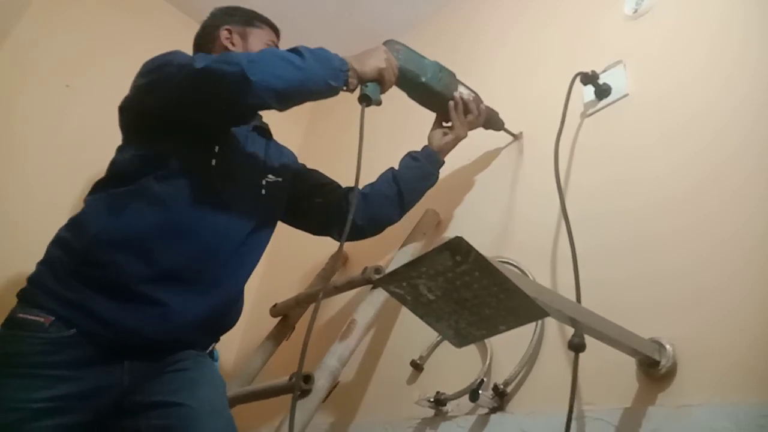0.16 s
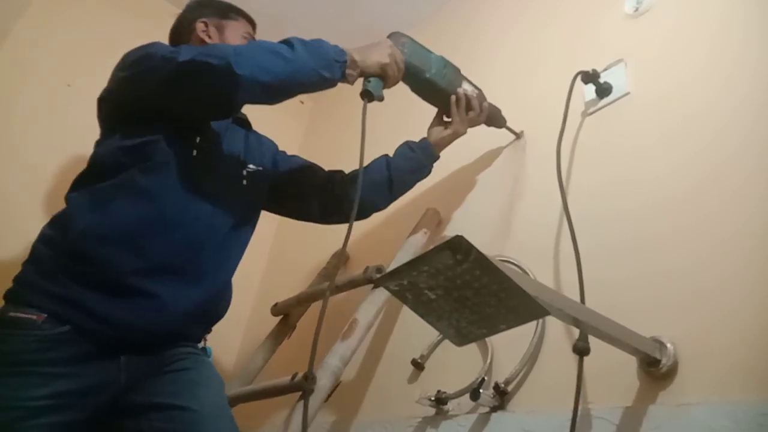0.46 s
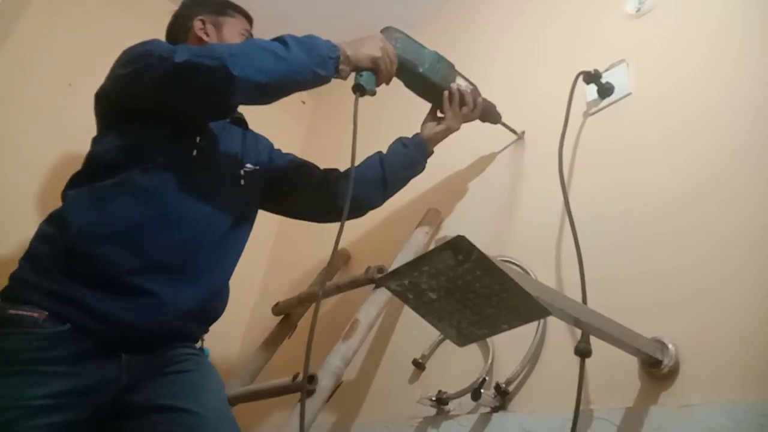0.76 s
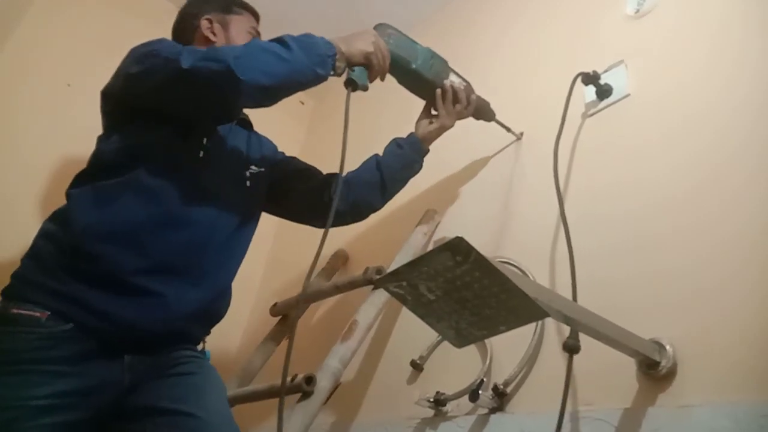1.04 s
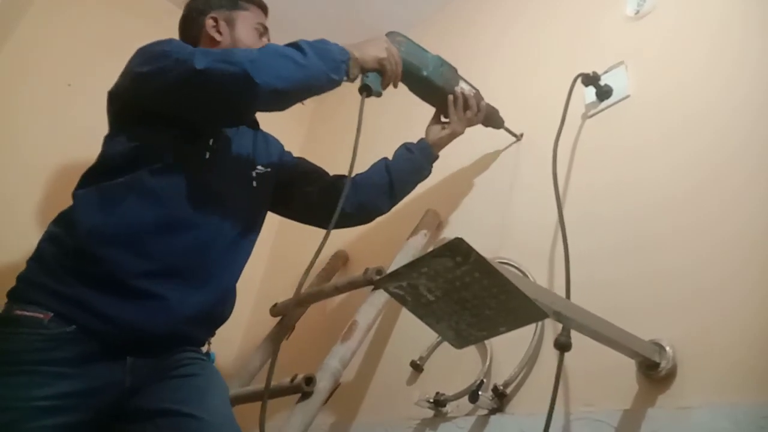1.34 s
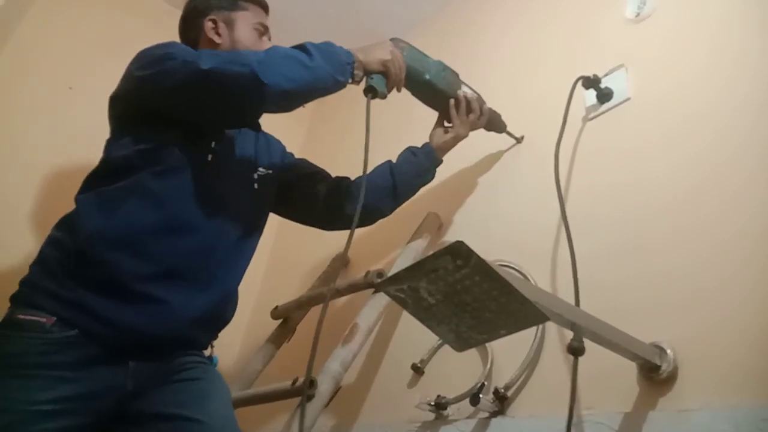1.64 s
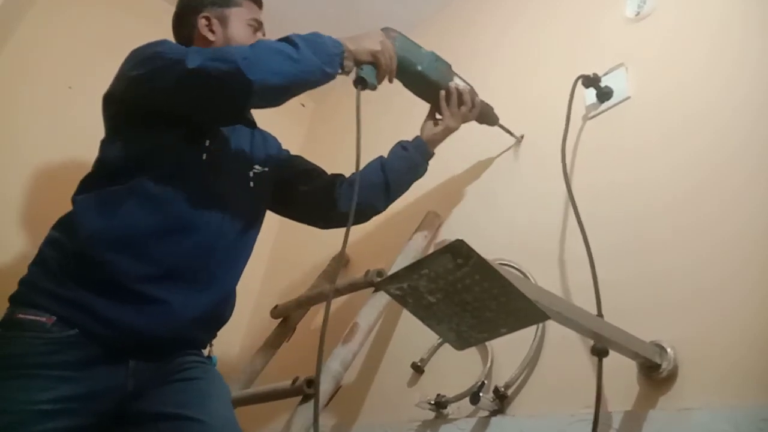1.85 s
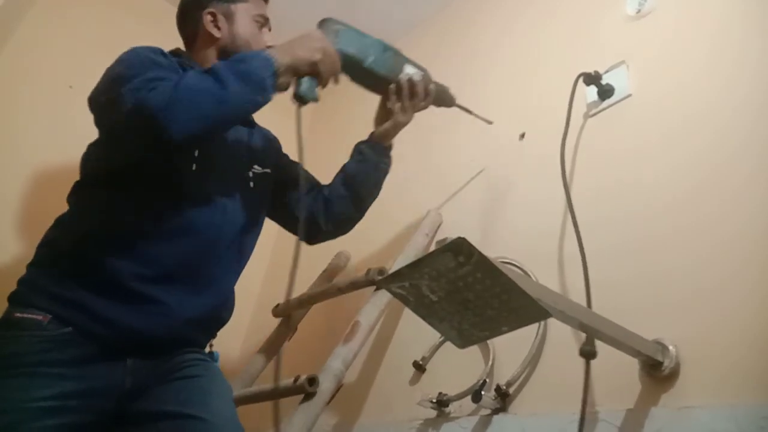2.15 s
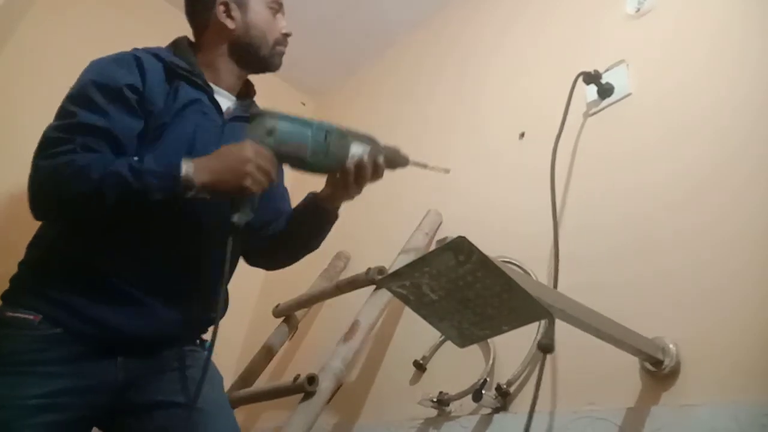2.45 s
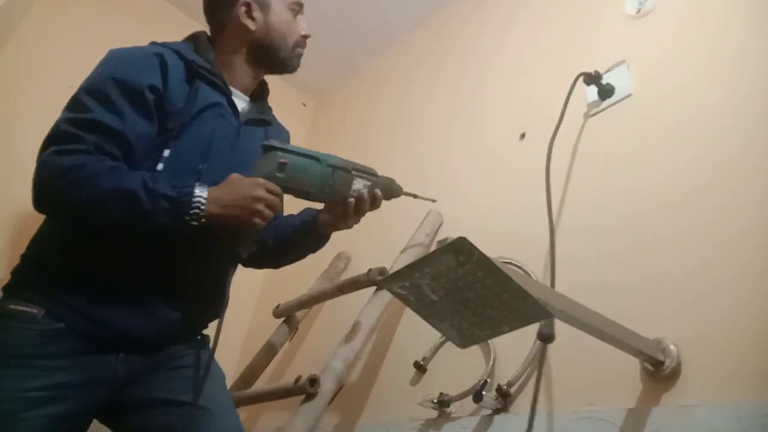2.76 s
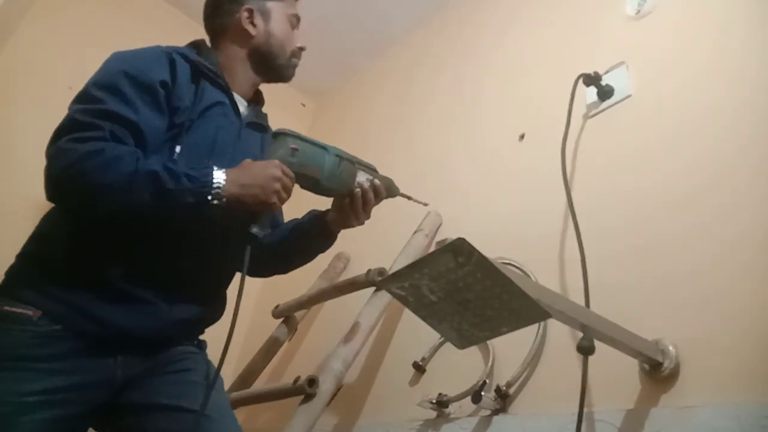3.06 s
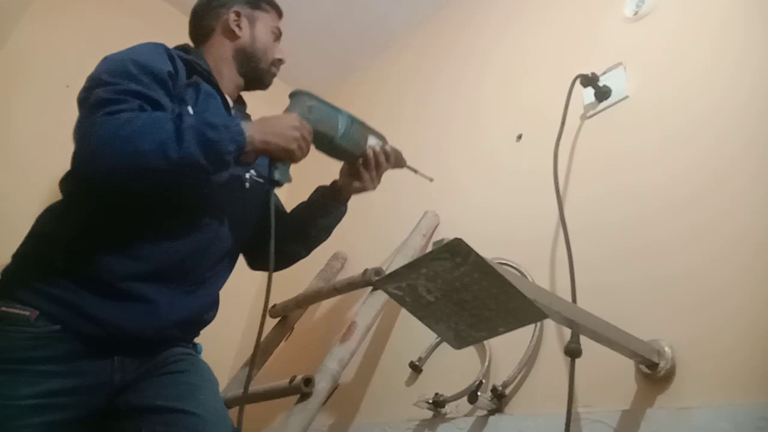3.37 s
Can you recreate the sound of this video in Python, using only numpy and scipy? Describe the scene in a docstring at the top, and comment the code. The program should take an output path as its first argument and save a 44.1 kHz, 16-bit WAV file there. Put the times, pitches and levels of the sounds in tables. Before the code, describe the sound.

Close single-microphone sound in a small reverberant room: harsh buzzing drill, falling whine and grinding as it slows, a short scrape, then quiet sleeve and cord rustling with light tool knocks over faint hiss.

```python
"""Small bare room, one microphone on both channels, hiss and a low rumble that is weaker while the drill is
loud. A corded hammer drill bores into the wall: gated noise blows over dense grinding contacts. The trigger
is let go at 0.47 s; the blows die, the gear whine falls and the slowing chuck catches, each catch a burst of
contacts. Near 2 s the bit scrapes out of the hole. Then sleeve and cord rustle as coloured grains and the
tool knocks as short noise bands."""
import sys
import numpy as np
from scipy import signal
from scipy.fft import rfft, irfft
from scipy.io import wavfile

SR = 44100
rng = np.random.default_rng(int(sys.argv[2]) if len(sys.argv) > 2 else 0)


def unload_audio(sound):
    """Save the sound as a 16-bit wav file, at the path given as the first command line argument."""
    columns = np.transpose(np.atleast_2d(sound))
    # keep every value between -1 and 1, then stretch to whole-number steps
    steps = np.round(np.clip(columns, -1, 1) * 32767)
    wavfile.write(sys.argv[1], SR, steps.astype(np.int16))


def invert_db(level):
    """Linear amplitude ratio for a level in decibels (20 dB per decade), elementwise."""
    return 10 ** (np.asarray(level, dtype=float) / 20)


N = 154350
T = np.arange(N) / SR

# Background hiss spectrum: pitch_hz, relative_db
HISS_COLOUR = [(410, -57.5), (700, -30), (1200, -5.5), (3000, -10), (7000, -17.5), (16000, -14)]
# Low rumble spectrum: pitch_hz, relative_db
RUMBLE_COLOUR = [(25, -53), (32, -26), (78, -10.5), (97, 1), (172, -5.5), (241, -16), (350, -22.5),
                 (738, -26.5), (1300, -38.5), (2640, -120)]
# Level of the rumble, low while the drill is loud: start_s, level_db
RUMBLE_LEVEL = [(0, -69), (.9, -68), (1.25, -63.5), (1.6, -50.5), (2.1, -56.5), (2.4, -55.5), (2.7, -58),
                (3.1, -51), (3.5, -57.5)]
# Soft knocks of the tool: start_s, level_db, centre_hz, length_s, half_width_octaves
KNOCKS = [(2.26, -54, 1640, 0.12, 0.31), (2.402, -50, 1440, 0.036, 0.2), (2.645, -50.5, 650, 0.053, 1.7),
          (2.818, -61, 1240, 0.051, 0.082), (3.165, -55.5, 2510, 0.019, 0.2),
          (3.292, -64, 1700, 0.068, 0.11), (3.416, -62, 1890, 0.023, 0.42)]
# Sleeve and cord rustling: start_s, level_db, bright_share (0-1)
RUSTLE = [(2.15, -63, 0.4), (2.262, -54.5, 0.7), (2.275, -51.5, 0.74), (2.43, -48.5, 0.45),
          (2.51, -46, 0.8), (2.6, -43.5, 0.58), (2.706, -54, 0), (2.75, -68, 0.6), (2.818, -57, 0.6),
          (2.84, -52, 0.4), (2.94, -64, 0.7), (2.99, -66, 0.4), (3.16, -95, 0.4), (3.167, -58.5, 0.62),
          (3.2, -62, 0.8), (3.225, -82, 0.5), (3.35, -60, 0.6), (3.41, -57.5, 0.5), (3.444, -53, 0.3),
          (3.5, -68, 0.4)]
# Rustle spectrum before tilting: pitch_hz, relative_db
RUSTLE_COLOUR = [(180, -64), (330, -30), (900, -21), (1250, -9.5), (1900, -2), (2700, -0.5), (4000, -4.5),
                 (7000, -2), (10000, 1), (16000, -18)]
# Rings of the rubbed casing: pitch_hz, width_hz, gain_db
CASING_RINGS = [(2800, 250, 4), (5500, 250, 4)]
# Bit drawn out of the hole: start_s, level_db
SCRAPE = [(1.93, -52), (1.955, -34), (1.98, -29.5), (2.02, -30), (2.05, -35), (2.08, -42), (2.12, -56),
          (2.16, -75)]
# Scrape spectrum: pitch_hz, relative_db
SCRAPE_COLOUR = [(180, -64), (340, -24.5), (850, -6.5), (1700, -6.5), (2300, 1), (2800, 1), (3300, 1),
                 (4800, -6), (7000, -5), (16000, -13.5)]
# Catches of the slowing chuck: start_s, peak_db
CATCHES = [(1.44, -38.5), (1.523, -30.5), (1.6, -38.5), (1.71, -70.5), (1.80, -41), (1.955, -37)]
# Tooth rate of the coasting gear pair: start_s, pitch_hz, level_db
MESH = [(.56, 4450, -34), (.7, 3830, -30), (.85, 3180, -30.5), (1.0, 2520, -26), (1.12, 2130, -24),
        (1.25, 1720, -28.5), (1.42, 1250, -31), (1.52, 960, -36), (1.61, 760, -34.5), (1.7, 520, -60)]
# Gears and bit grinding, before a common trim: start_s, relative_db
GRIND = [(0.0, -11.5), (0.158, -13), (0.398, -13), (0.828, -15.5), (1.282, -17.5), (1.386, -17.5),
         (1.616, -16.5), (1.702, -22), (1.714, -17), (1.806, -29), (1.948, -30), (1.96, -61.5)]
# Grinding spectrum: pitch_hz, relative_db
GRIND_COLOUR = [(100, -47), (180, -21), (350, -20.5), (790, -11), (1200, -11), (2100, -1.5), (3600, -5.5),
                (5000, -15), (7000, -14), (10000, -13), (16000, -22.5)]
# Steady motor tones: pitch_hz, level_db
MOTOR_TONES = [(104, -44)]
# Hammer blow spectrum: pitch_hz, relative_db
BLOW_COLOUR = [(40, -60), (75, -46.5), (150, -10.5), (270, -16.5), (400, -8), (730, -9.5), (1300, -10.5),
               (2600, -10), (6700, -9.5), (16000, -14.5)]
# Low tones at multiples of the blow rate: multiple, level_db
BLOW_TONES = [(1, -42.5), (2, -44), (3, -43.5)]
# Narrow rings of casing and wall under the hammer: pitch_hz, width_hz, level_db
HAMMER_RINGS = [(716, 22, -38), (894, 24, -37), (1082, 12, -39), (1454, 12, -38), (1631, 18, -40),
                (2660, 50, -34)]
# Colour of the microphone: pitch_hz, gain_db
MIC_COLOUR = [(4300, -0.5), (4900, -1.5), (5600, 1.5), (6200, -4), (6700, 0.5), (7400, -8), (8150, -17.5),
              (9200, -10), (10800, -13.5), (12900, -19.5), (14000, -10), (14900, -8), (15500, -1)]


def rms_one(x):
    """Scale to unit rms."""
    return x / np.sqrt(np.mean(x ** 2) + 1e-20)


def curve(rows, column=1, outside=None):
    """One table column against time; the end values hold unless outside is given."""
    rows = np.array(rows)
    return np.interp(T, rows[:, 0], rows[:, column], outside, outside)


def coloured(x, points):
    """Shape x by a spectrum table, straight lines over log frequency; rms 1."""
    hz = np.arange(N // 2 + 1) * SR / N + 1  # +1 keeps the log finite
    hz_at, db = np.transpose(points)
    gain_db = np.interp(np.log(hz), np.log(hz_at), db, -90, -90)
    return rms_one(irfft(rfft(x) * invert_db(gain_db), N))


def tilted(x, points, db_per_octave):
    """Colour with an extra slope about 2 kHz; rms 1."""
    return coloured(x, [(hz, db + db_per_octave * np.log2(hz / 2000)) for hz, db in points])


def filtered(x, hz, kind, order=2):
    """Butterworth filter, forward in time."""
    return signal.sosfilt(signal.butter(order, hz, kind, fs=SR, output="sos"), x)


def drift(rate_hz):
    """Slow chance with spread 1: noise through two equal low-pass poles."""
    r = np.exp(-2 * np.pi * rate_hz / SR)
    noise = rng.standard_normal(N + SR)
    return rms_one(signal.lfilter([1], [1, -2 * r, r * r], noise)[SR:])


def resonance(x, hz, width_hz):
    """Two-pole band-pass with gain 1 on top."""
    r = np.exp(-np.pi * width_hz / SR)
    poles = [1, -2 * r * np.cos(2 * np.pi * hz / SR), r * r]
    return signal.lfilter([(1 - r * r) / 2, 0, (r * r - 1) / 2], poles, x)


def grains(per_s, spread_db):
    """Random contacts of uneven size."""
    size = invert_db(spread_db * np.minimum(rng.exponential(1, N), 5)) * rng.standard_normal(N)
    return size * (rng.random(N) < per_s / SR)


def burst(start_s, length_s):
    """Quick rise and exponential fall, top about 1."""
    u = np.clip(T - start_s, 0, None) / length_s
    return u / (u + .15) * np.exp(-u) * (T > start_s) * 2


def hiss():
    """Steady background noise, shaped by its spectrum."""
    return invert_db(-62.5) * coloured(rng.standard_normal(N), HISS_COLOUR)


def rumble():
    """Low noise, weaker while the drill is loud, with a small random flicker."""
    level_db = curve(RUMBLE_LEVEL) + 1.2 * drift(7.9)
    return invert_db(level_db) * coloured(rng.standard_normal(N), RUMBLE_COLOUR)


def knocks():
    """Soft knocks of the tool: short bursts of band-passed noise."""
    out = np.zeros(N)
    for start_s, db, hz, length_s, octaves in KNOCKS:
        edges_hz = hz * 2 ** (octaves * np.array([-1, 1]))
        band = filtered(rng.standard_normal(N), edges_hz, "band", order=1)
        out += invert_db(db) * burst(start_s, length_s) * rms_one(band)
    return out


def rustle():
    """Sleeve and cord rub in many small contacts, moving between a dull and a bright colour."""
    share = np.clip(curve(RUSTLE, column=2), 0, 1)
    dull = tilted(grains(3500, 1.5), RUSTLE_COLOUR, -5)
    bright = tilted(grains(3500, 1.5), RUSTLE_COLOUR, 3)
    level_db = curve(RUSTLE, outside=-105) + 1.5 * drift(22)
    return invert_db(level_db) * (np.sqrt(1 - share) * dull + np.sqrt(share) * bright)


def scrape():
    """The bit drawn out of the hole: dense contacts of very uneven size."""
    return invert_db(curve(SCRAPE, outside=-101.0)) * coloured(grains(12000, 2.6), SCRAPE_COLOUR)


def handling():
    """Scrape, rustle and knocks, strengthened where the casing rings."""
    touch = scrape() + rustle() + knocks()
    return touch + sum((invert_db(db) - 1) * resonance(touch, hz, width_hz) for hz, width_hz, db in CASING_RINGS)


def chuck_catches():
    """The slowing chuck catches: short bursts of contacts, brighter than the grinding."""
    bright = tilted(grains(8100, 1), GRIND_COLOUR, 9)
    return bright * sum(invert_db(db) * burst(start_s, .022) for start_s, db in CATCHES)


def fan(speed):
    """Cooling fan: high-passed air noise whose strength follows a power of the speed."""
    air = filtered(rng.standard_normal(N), 2800, "high")
    return invert_db(-24 + 5.5 * drift(21)) * speed ** 2.38 * air


def gear_whine(speed):
    """Meshing teeth: a noisy band round a weak falling tone, and the armature's once-a-turn tone."""
    mesh = 2 * np.pi * np.cumsum(curve(MESH)) / SR
    width_hz, clean, pinion_teeth = 140, .8, 14
    whine = (clean + drift(width_hz)) * np.sin(mesh) + drift(width_hz) * np.cos(mesh)
    # the whine's level flickers slightly at random
    level_db = curve(MESH, column=2, outside=-104) + 1.2 * drift(27)
    armature = invert_db(-42 + 3.0 * drift(8)) * speed ** 7.0 * np.sin(mesh / pinion_teeth)
    return invert_db(level_db) * whine + armature


def grinding(speed):
    """Dense tooth and bit contacts; the low body and the top edge fade as the speed falls."""
    level_db = curve(GRIND, outside=-92) - 3.5 + 0.76 * drift(44)
    out = invert_db(level_db) * coloured(grains(20000, 1.0), GRIND_COLOUR)
    body = signal.sosfiltfilt(signal.butter(2, 450, fs=SR, output="sos"), out)
    edge = signal.sosfiltfilt(signal.butter(2, 11000, "high", fs=SR, output="sos"), out)
    return out - body * (1 - speed) - edge * (1 - speed ** 0.66)


def gears():
    """Everything that turns, driven by the speed relative to full running."""
    speed = curve(MESH) / MESH[0][1]
    return chuck_catches() + fan(speed) + gear_whine(speed) + grinding(speed)


def motor_tones():
    """Steady low tones of the motor, wavering in level."""
    out = np.zeros(N)
    for hz, db in MOTOR_TONES:
        out += invert_db(db + 5.6 * drift(7)) * np.sin(2 * np.pi * (hz * T + rng.random()))
    return out


def blows():
    """Each blow gates a broad noise, rings casing and wall and leaves low tones."""
    blows_per_s, depth = 75.4, 0.11
    count = np.cumsum(blows_per_s * (1 + 0.003 * drift(8))) / SR
    gate = 1 - depth + 3 * depth * np.exp(-3.0 * (count % 1))
    noise = rng.standard_normal(N) * gate
    out = invert_db(-19) * coloured(noise, BLOW_COLOUR)
    for hz, width_hz, db in HAMMER_RINGS:
        out += invert_db(db) * rms_one(resonance(noise, hz, width_hz))
    for multiple, db in BLOW_TONES:
        tone = np.sin(2 * np.pi * (round(multiple) * count + rng.random()))
        out += invert_db(db + 2.5 * drift(6)) * tone
    return out


def hammer():
    """Blows and motor tones, fading exponentially once the trigger is let go."""
    release_s, fade_s = .47, .09
    return np.exp(-np.clip(T - release_s, 0, None) / fade_s) * (blows() + motor_tones())


def room(x):
    """A dying cloud of reflections after a short gap; the walls return little bass or treble."""
    t60_s, gap_s = 0.26, .006
    t = np.arange(SR // 2) / SR
    cloud = filtered(rng.standard_normal(len(t)), [146, 14500], "band", order=1)
    tail = cloud * invert_db(-60 * t / t60_s) * (t > gap_s)
    return signal.fftconvolve(x, tail / np.sqrt(np.sum(tail ** 2)))[:N]


def scene():
    """Drill and handling in the room, over rumble and hiss; one microphone on two channels."""
    near = handling() + gears() + hammer()
    # a narrow ring that every near sound sets off: 1258 Hz, 30 Hz wide, 14 dB
    near = near + (invert_db(14) - 1) * resonance(near, 1258, 30)
    mono = hiss() + rumble() + near + invert_db(-7) * room(near)
    return np.array([mono, mono])


def top_cut(x):
    """Nothing passes above the cut-off."""
    return signal.sosfilt(signal.butter(12, 16890, fs=SR, output="sos"), x)


def record(dry):
    """Microphone: low cut, its colour, soft ceiling at 1, then a steep top cut."""
    x = filtered(dry, 60, "high", order=4)
    size = N + SR
    hz = np.arange(size // 2 + 1) * SR / size
    x = irfft(rfft(x, size) * invert_db(np.interp(hz, *np.transpose(MIC_COLOUR))), size)
    mix = irfft(rfft(np.tanh(x)) * (hz < 15600), size)
    return top_cut(mix[:, :N])


dry = scene()
out = record(dry)
unload_audio(out)
```